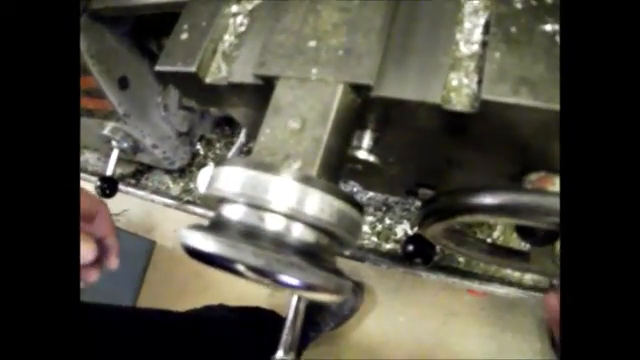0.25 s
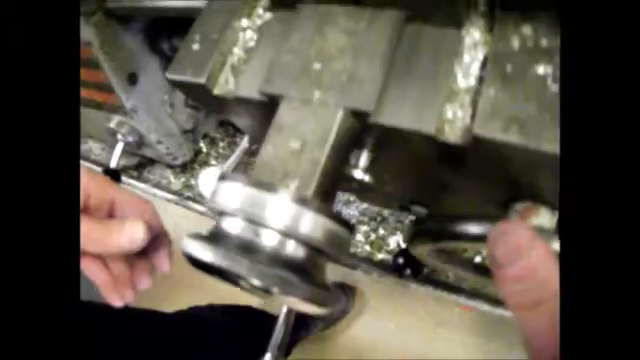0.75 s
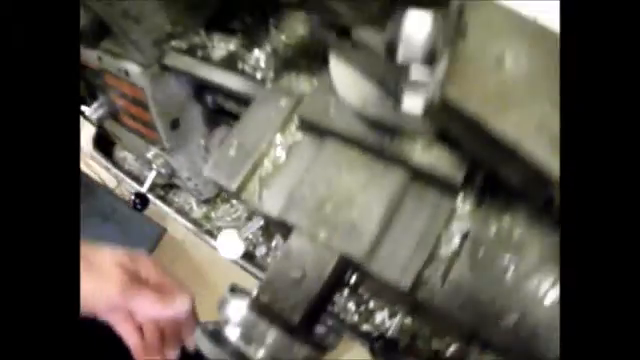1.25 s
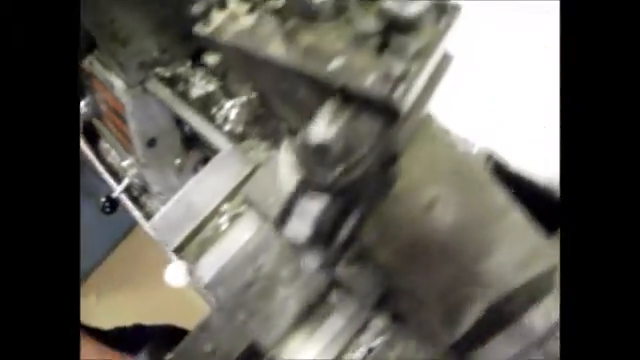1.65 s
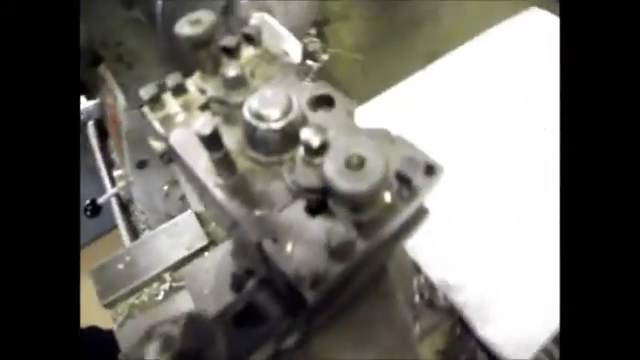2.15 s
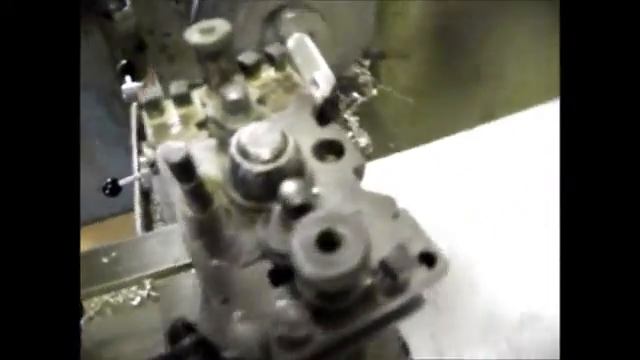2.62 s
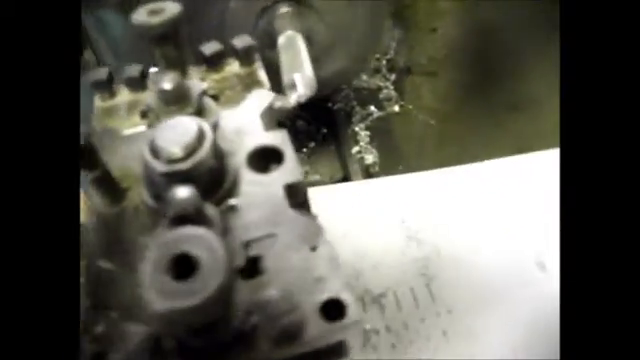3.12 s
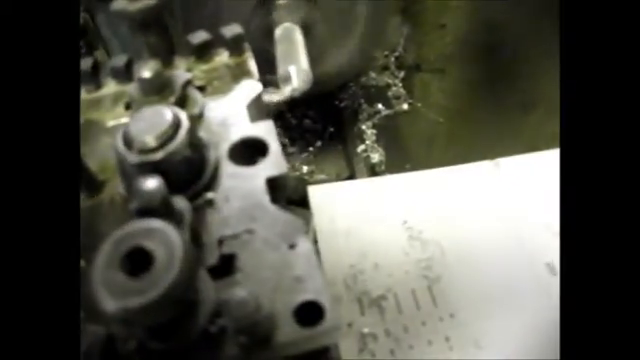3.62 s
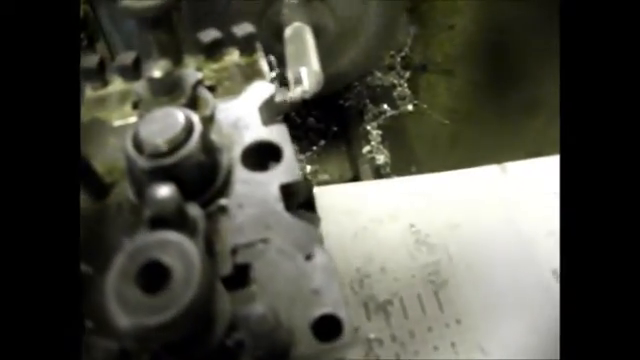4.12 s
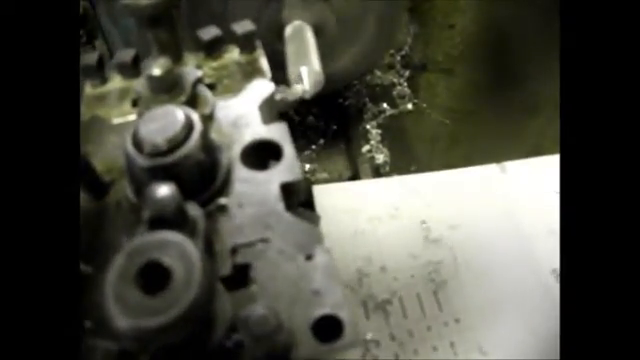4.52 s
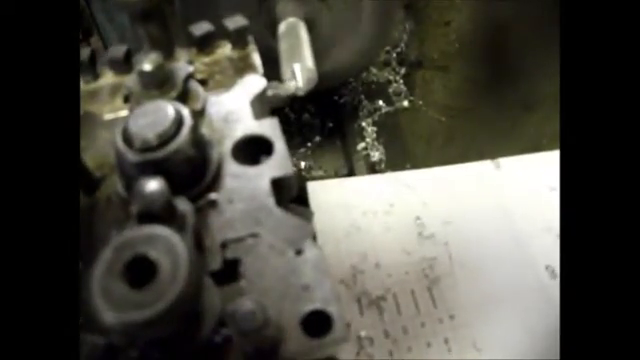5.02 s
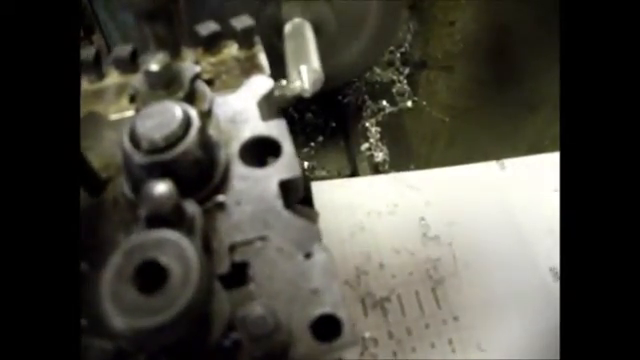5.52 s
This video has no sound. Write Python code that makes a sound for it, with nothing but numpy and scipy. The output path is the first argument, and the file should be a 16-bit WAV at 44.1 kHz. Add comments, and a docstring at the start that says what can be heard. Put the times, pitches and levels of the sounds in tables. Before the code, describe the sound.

A close handheld microphone with dull treble and crowded, gently distorted peaks catches a lathe switched on: faint brush, hard clack, frame thump, fast upward gear howl. Then constant harsh gear clatter and whine with a rapid flutter once per spindle turn. As the microphone swings to the tool, the main whine dips briefly, the tone colour shifts, and fine scraping hiss appears, continuing to the end.

```python
"""A faint brush, then the clack of a switch: a geared metal lathe runs up in a third of a second.
The frame shudders, the gears howl upwards through the casing resonances, then whine and throb once a turn.
Gear tones are phase-modulated cosines locked to one spindle angle; teeth knock a resonant headstock.
The tool's thin hiss is noise through narrow resonances, heard as the microphone nears the tool post.
That narrow-band microphone just overloads: a limiter and soft saturation shape the peaks."""
import sys
import numpy as np
from scipy import signal
from scipy.fft import rfft, irfft
from scipy.io import wavfile
from scipy.ndimage import uniform_filter1d, minimum_filter1d

SR = 44100
rng = np.random.default_rng(int(sys.argv[2]) if len(sys.argv) > 2 else 0)


def log_audio(samples):
    """Write samples as a 16-bit WAV file to the path given in sys.argv[1]."""
    # one column per channel
    frames = np.atleast_2d(samples).T
    # limit to full scale, then quantise
    limited = np.clip(frames, -1, 1)
    pcm = np.round(limited * 32767).astype(np.int16)
    wavfile.write(sys.argv[1], SR, pcm)


N = 254456
T, HZ = np.arange(N) / SR, np.fft.rfftfreq(N, 1 / SR)  # time in seconds, spectrum frequencies in Hz

# Path of the microphone. Each row: time in seconds, place from 0 (handwheel) to 1 (tool post).
MIC_PATH = [(1.1, 0.25), (1.6, 0.38), (2.0, 1)]
# Background noise of the room. Each row: frequency in Hz, relative density in dB per Hz.
ROOM_SPECTRUM = [(30, -3.5), (60, -12.5), (90, -11), (140, -8), (220, -13), (420, -21.5), (1100, -31.5),
                 (2000, -18.5), (3000, -27), (4000, -34.5), (5200, -35.5)]
# Contacts of the switch: a brush, a touch, a slam. Each row: start in seconds, level in dB, decay in seconds.
SWITCH_BLOWS = [(.01, -39, .03), (.1282, -13, .002), (.1295, -2, .007)]
# Modes of the switch. Each row: frequency in Hz, width in Hz, relative level in dB.
SWITCH_MODES = [(500, 65, -8.5), (1360, 320, -3.5), (1780, 71, 3.5), (2080, 200, 0), (2400, 190, -1),
                (2810, 190, 1), (3200, 220, -0.5), (4160, 840, -12)]
# Modes of the shuddering frame. Each row: frequency in Hz, width in Hz, relative level in dB.
FRAME_MODES = [(128, 35, 0.5), (190, 46, -2.5), (275, 70, -1.5), (387, 95, -6), (514, 54, 3), (702, 44, 2),
               (990, 250, -1), (1110, 67, -5)]
# Modes of the headstock. Each row: frequency in Hz, width in Hz, relative level in dB at the handwheel,
# relative level in dB at the tool post.
HEADSTOCK_MODES = [(113, 18, -16.5, -11), (125, 22, -10.5, -10.5), (256, 44, -8, -14), (512, 64, -2, -8.5),
                   (646, 230, -22.5, -12), (840, 110, -5.5, -7), (990, 150, -4.5, -4), (1370, 140, -15, -9),
                   (1593, 140, -10, -5.5), (1667, 61, -4, -4.5), (1906, 190, -5, 1.5),
                   (2017, 70, -2.5, 2.5), (2240, 190, -4.5, -2.5), (2560, 150, 4, -11),
                   (2702, 118, 2.5, 0.5), (2850, 105, -2, 1.5), (2993, 136, 1.5, 4.5), (3130, 136, 4, -3.5),
                   (3326, 127, -3, -0.5), (3417, 120, -3.5, -14), (3554, 44, -2.5, -4),
                   (3790, 540, -12, -16), (4426, 330, -17, -17), (5040, 136, -26, -23)]
# Broad clatter between those modes. Each row: frequency in Hz, relative density in dB per Hz.
CLATTER_SPECTRUM = [(20, -17.5), (60, -30.5), (110, -17.5), (300, -11.5), (400, -17.5), (800, -13.5),
                    (1200, -11.5), (2400, -3.5), (3300, -9), (3800, -18), (4300, -25), (4800, -32),
                    (5500, -32.5)]
# Casing modes that the run-up sweeps through. Each row: frequency in Hz, width in Hz, relative level in dB.
CASING_MODES = [(530, 45, -8), (817, 39, -17.5), (865, 21, -19.5), (1180, 70, -10)]
# Whine of the other gears. Each row: frequency in cycles per turn, mean level at full speed in dB at the
# handwheel, the same in dB at the tool post.
GEAR_TONES = [(1, -44, -44), (9, -40, -41), (33.6, -40, -42), (40, -48, -35.5), (67.2, -41, -39),
              (72, -34, -36), (73, -39, -38), (74, -40, -40), (85.05, -39, -33.5), (96, -39, -38),
              (102.8, -35, -32), (117.85, -40, -34)]
# Main mesh and its once-a-turn sidebands. Each row: frequency in cycles per turn, relative level in dB at
# the handwheel, relative level in dB at the tool post.
MESH_SIDEBANDS = [(44, -32, -34), (45, -38, -38), (46, -30.5, -35), (47, -34, -29.5), (48, -25.5, -27),
                  (49, -40, -35), (50, -23.5, -37), (51, -38, -32), (53, -38, -37)]
# Main whine, dipping while the microphone swings round. Each row: time in seconds, level change in dB.
MESH_SWELL = [(.5, 1.5), (1.2, .5), (2.1, -3), (3.3, -0.5)]
# Overtones of the drive gear. Each row: multiple of its mesh frequency, relative level in dB at the
# starting place, relative level in dB on the way, relative level in dB at the tool post.
DRIVE_OVERTONES = [(3, -23, -25.5, -23), (4, -25, -20, -25.5), (5, -18.5, -15, -18)]
# Modes of the tool. Each row: frequency in Hz, width in Hz, relative level in dB.
TOOL_MODES = [(1590, 35, -7), (2005, 70, -5), (2180, 40, -9), (2975, 50, 0), (3035, 40, 0), (3270, 50, -9)]

ROOM_DB = -38
# the spindle: switched on, it gains speed evenly, then eases into its top speed (higher KNEE, sharper bend)
START_S, RUN_UP_S, TOP_TURNS_PER_S, KNEE = .128, .177, 18.627, 5
# the load of the cut comes on gradually and slows the spindle a little
LOAD_S, LOAD_RISE_S, SAG_TURNS_PER_S = 1.6, .9, .02
# shudder of the frame: when it begins, time to its peak, level at the peak
SHUDDER_S, SHUDDER_RISE_S, SHUDDER_DB = 0.11, 0.094, -13.5
HUM_HZ = 200.05
# tooth rattle: level at full speed, change towards standstill, time to set in
RATTLE_DB, CRAWL_DB, RATTLE_ATTACK_S = -10.5, -4, 0.0072
# where in the turn the main gear binds, and how far that shifts from handwheel to tool post (turns)
TIGHT_TURN, SHIFT_TURN = .516, .25
DRIVE_PER_TURN = 33.6  # drive gear mesh cycles per spindle turn
ON_THE_WAY = 0.29  # place where the microphone passes the drive gear
# hiss of the cut: mean level at the tool post, change out to the handwheel
CUT_DB, CUT_FAR_DB = -20.5, -33
MIC_EDGE_HZ, EDGE_HZ = 5400, 15900  # low-pass edges before and after the overload


def amp(db):
    """Level law: decibels to amplitude gain."""
    return 10 ** (np.asarray(db) / 20)


def unit(x):
    """Normalisation to rms 1."""
    return x / np.sqrt(np.mean(x ** 2) + 1e-20)


def curve(rows):
    """Linear interpolation of (seconds, value) rows over time."""
    return np.interp(T, *np.transpose(rows))


def spectrum(points):
    """Spectral envelope: gain at every frequency, straight in dB over log frequency."""
    hz, db = np.transpose(points)
    return amp(np.interp(np.log(HZ + 1), np.log(hz), db))


def resonances(modes):
    """Modal response: the powers of steep-sided resonances add up; returns gain at every frequency."""
    power = 0
    for hz, width, db in modes:
        detuning = (HZ - hz) / (0.71 * width)
        power = power + (amp(db) / (1 + detuning ** 2)) ** 2
    return np.sqrt(power)


def colour(x, gain):
    """Minimum-phase filtering: causality ties phase to log gain, so each blow rings only afterwards."""
    log_gain = np.log(np.maximum(gain, 1e-5))
    mirrored = np.r_[log_gain, log_gain[-2:0:-1]]
    phase = -signal.hilbert(mirrored).imag[:len(HZ)]
    return irfft(rfft(x) * gain * np.exp(1j * phase), N)


def noise(gain):
    """Spectral shaping: white noise takes the given spectrum, at rms 1."""
    return unit(irfft(rfft(rng.standard_normal(N)) * gain, N))


def wander(rate_hz):
    """Random modulation: noise of rms 1 confined to slow rates."""
    return noise(1 / (1 + (HZ / rate_hz) ** 4))


def low_pass(x, edge_hz, order):
    """Linear-phase filtering: a steep low-pass with its delay removed."""
    taps = signal.firwin(order, edge_hz, window=("kaiser", 8), fs=SR)
    return signal.oaconvolve(x, taps[None], "same")


def smooth(x, seconds):
    """Exponential averaging: a first-order lag with the given time constant."""
    keep = np.exp(-1 / (seconds * SR))
    return signal.lfilter([1 - keep], [1, -keep], x)


def spindle_speed():
    """Uniform acceleration with a soft knee, then a slight sag under load, in turns per second."""
    ramp = np.maximum(T - START_S, 0) / RUN_UP_S
    load = np.clip((T - LOAD_S) / LOAD_RISE_S, 0, 1)
    top_speed = TOP_TURNS_PER_S - SAG_TURNS_PER_S * load
    return ramp / (1 + ramp ** KNEE) ** (1 / KNEE) * top_speed


def room_noise():
    """Stationary noise: the room has a fixed spectrum and level."""
    return amp(ROOM_DB) * noise(spectrum(ROOM_SPECTRUM))


def switch():
    """Impact excitation: decaying contacts shape a dense burst of noise at the metal's modes."""
    blows = np.zeros(N)
    for start_s, db, decay_s in SWITCH_BLOWS:
        age = np.maximum(T - start_s, 0)
        blows += amp(db) * (T >= start_s) * np.exp(-age / decay_s)
    return blows * noise(resonances(SWITCH_MODES))


def motor(speed, place, hum_db=-33, turned_away_db=-2, waver_db=2, slip_rad=0.12):
    """Forced vibration: the motor hums on the mains; its starting jolt shakes the frame in one quick swell."""
    age = np.maximum(T - SHUDDER_S, 0) / SHUDDER_RISE_S
    swell = (age * np.exp(1 - age)) ** 2  # peaks at 1 when age is 1
    shudder = amp(SHUDDER_DB) * swell * noise(resonances(FRAME_MODES))
    hum = np.sqrt(2) * np.sin(2 * np.pi * HUM_HZ * T + slip_rad * wander(10))
    hum_level = amp(hum_db + turned_away_db * place + waver_db * wander(2.7)) * speed / speed.max()
    return shudder + hum * hum_level


def tooth_rattle(speed, turns, place, chance=1.32, spread_db=0.94, wear_db=1.97, twice_db=1.0,
                 twice_turn=0.041, rub=1.58, shaft_db=0.82):
    """Impact and friction: teeth knock through backlash, partly alike every turn, and rub; the headstock rings."""
    knocks = np.zeros(N)
    for teeth in (48, 72, 40):
        tooth = np.floor(teeth * turns + rng.random()).astype(int)
        at = np.flatnonzero(np.diff(tooth)) + 1  # samples where the next tooth meets
        own = rng.standard_normal(teeth)[tooth[at] % teeth]  # repeats every turn
        fresh, size = rng.standard_normal((2, N))[:, at]
        knocks[at] += np.tanh(own + chance * fresh) * amp(spread_db * size)
    # the load follows uneven wear round the gear, its oval shape and a slower side shaft
    wear = np.interp(turns, np.arange(16) / 16, unit(rng.standard_normal(16)), period=1)
    oval = np.cos(2 * np.pi * 2 * (turns - twice_turn))
    side_shaft = np.cos(2 * np.pi * .759 * turns)
    load = amp(wear_db * wear + twice_db * oval + shaft_db * side_shaft)
    drive = (unit(knocks) + rub * rng.standard_normal(N)) * load
    modes, clatter = np.array(HEADSTOCK_MODES), spectrum(CLATTER_SPECTRUM)
    far = unit(colour(drive, np.hypot(resonances(modes[:, [0, 1, 2]]), clatter)))
    near = unit(colour(drive, np.hypot(resonances(modes[:, [0, 1, 3]]), clatter)))
    onset = np.clip((T - START_S) / RATTLE_ATTACK_S, 0, 1)
    force = onset * amp(RATTLE_DB + CRAWL_DB * (1 - speed / speed.max()))
    return force * (far + (near - far) * place)


def run_up(speed, turns, sweep_db=-30, easing=0.048, upper_db=-8, grit_rad=0.76):
    """Swept resonance: under starting torque the gears howl upwards, juddering, and boom at each casing mode."""
    torque = np.tanh((1 - speed / speed.max()) / easing) * np.tanh(speed / 3)
    howl = np.zeros(N)
    for teeth, db in ((48, 0), (72, upper_db)):
        judder_db = 2.5 * wander(70)
        howl += amp(db + judder_db) * np.cos(2 * np.pi * teeth * turns + grit_rad * wander(90))
    return np.sqrt(2) * colour(torque * howl, amp(sweep_db) + resonances(CASING_MODES))


def gear_whine(speed, turns, place, waver_db=3.5, slip_rad=0.27, build=0.83):
    """Synchronous tones: each gear sings a multiple of the spindle speed, wavering with its load."""
    out = np.zeros(N)
    for per_turn, far_db, near_db in GEAR_TONES:
        level = amp(far_db + (near_db - far_db) * place + waver_db * wander(2.3))
        phase = 2 * np.pi * (per_turn * turns + rng.random()) + slip_rad * wander(12)
        out += level * np.cos(phase)
    return np.sqrt(2) * out * (speed / speed.max()) ** build


def main_mesh(speed, turns, place, build=2.0, flutter_db=1.0, stagger_rad=0.42):
    """Sideband modulation: an off-centre gear's whine swells and slides upwards at one tight spot a turn."""
    angle = 2 * np.pi * (turns - TIGHT_TURN - SHIFT_TURN * place)
    teeth, scatter_rad, lag_rad = 48, .45, .16
    mesh = 2 * np.pi * teeth * turns + stagger_rad * place * wander(40)
    out = np.zeros(N)
    for per_turn, far_db, near_db in MESH_SIDEBANDS:
        side = per_turn - teeth
        # the gear drags, then springs free: the higher sidebands come later in the turn
        phase = mesh + side * angle - lag_rad * side ** 2 + scatter_rad * wander(3.8)
        out += amp(far_db + (near_db - far_db) * place) * np.cos(phase)
    level = amp(curve(MESH_SWELL) + flutter_db * wander(25))
    return np.sqrt(2) * out * level * (speed / speed.max()) ** build


def drive_gear(speed, turns, place, build=3, swell_db=3.5):
    """Harmonic series: the drive gear rings on overtones that flutter and swell, quivering more near the cut."""
    quiver = (.15 + .04 * place) * wander(45)
    mesh = 2 * np.pi * DRIVE_PER_TURN * turns + quiver
    flutter_db = 2.2 * wander(50) - 1.5 - 1.5 * place
    out = np.zeros(N)
    for multiple, *levels in DRIVE_OVERTONES:
        place_db = np.interp(place, [place.min(), ON_THE_WAY, 1], levels)
        level_db = place_db + swell_db * wander(2.5)
        out += amp(level_db + flutter_db) * np.cos(multiple * mesh)
    return np.sqrt(2) * out * (speed / speed.max()) ** build


def cutting(speed, place, flutter_db=2, drift_db=2.0):
    """Friction excitation: the chip scrapes over the tool and rings it unevenly, heard only close to it."""
    level_db = CUT_DB + CUT_FAR_DB * (1 - place) + drift_db * wander(1.5) + flutter_db * wander(30)
    return amp(level_db) * speed / speed.max() * noise(resonances(TOOL_MODES))


def scene():
    """Superposition: all sources add, and one spindle angle drives all the gears."""
    speed, place = spindle_speed(), np.clip(curve(MIC_PATH), 0, 1)
    turns = np.cumsum(speed) / SR
    mix = room_noise() + switch() + motor(speed, place)
    mix += tooth_rattle(speed, turns, place) + run_up(speed, turns)
    mix += gear_whine(speed, turns, place) + main_mesh(speed, turns, place)
    mix += drive_gear(speed, turns, place) + cutting(speed, place)
    return mix[None]


def limit(x, ceiling):
    """Partial limiting: the gain dips for two or three milliseconds round each peak above the ceiling."""
    gain = np.sqrt(ceiling / np.maximum(abs(x), ceiling))  # takes off half the excess in dB
    held = minimum_filter1d(gain, size=61)
    return x * uniform_filter1d(uniform_filter1d(held, size=31), size=31)


def record(dry, lift_db=9, threshold_db=-26, ceiling=0.99, hardness=18):
    """Gain control and saturation: the lift backs off at the start; the highest peaks spit faint treble."""
    narrow = low_pass(dry, MIC_EDGE_HZ, order=255)
    level_db = 10 * np.log10(smooth(narrow ** 2, 0.0092) + 1e-12)
    back_off_db = smooth(np.clip(level_db - threshold_db, 0, lift_db), 0.0043)
    loud = limit(narrow * amp(lift_db - back_off_db), ceiling)
    saturated = loud / (1 + abs(loud) ** hardness) ** (1 / hardness)
    return low_pass(saturated, EDGE_HZ, order=511)


dry = scene()
out = record(dry)
log_audio(out)
```